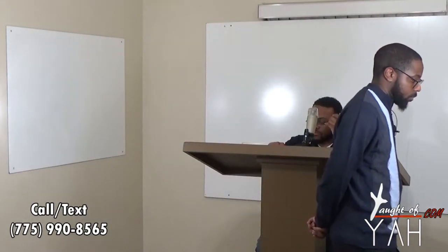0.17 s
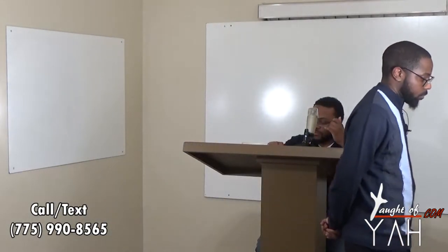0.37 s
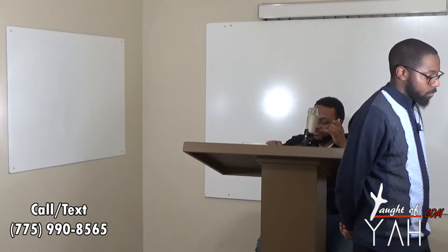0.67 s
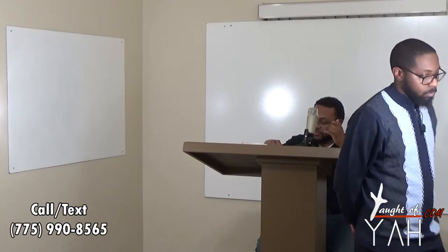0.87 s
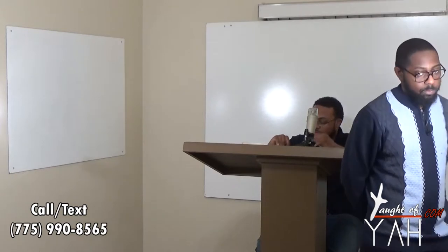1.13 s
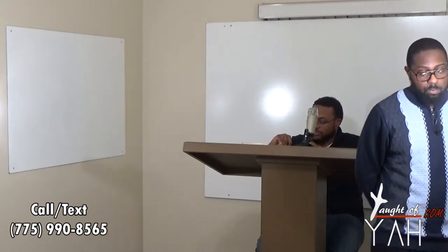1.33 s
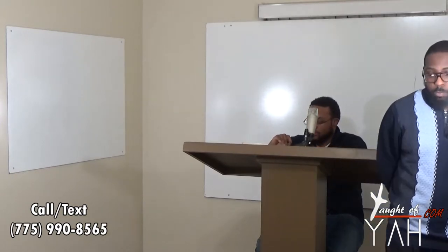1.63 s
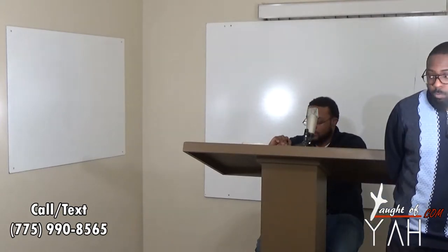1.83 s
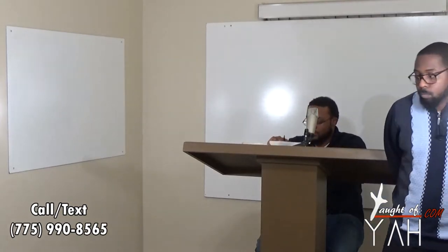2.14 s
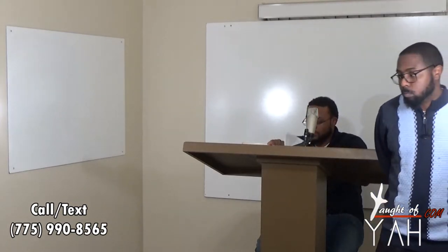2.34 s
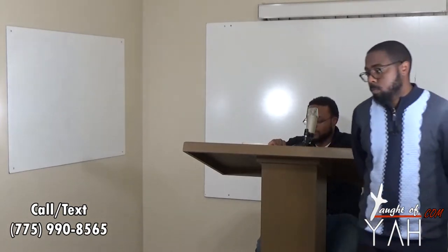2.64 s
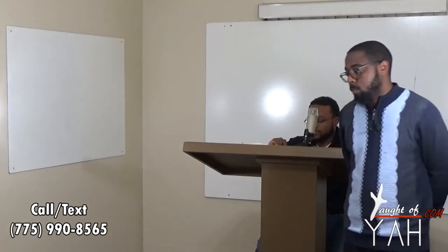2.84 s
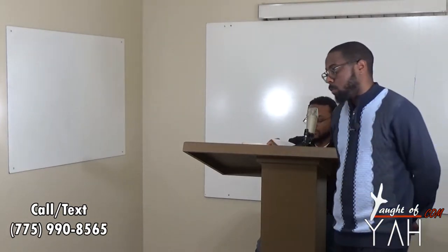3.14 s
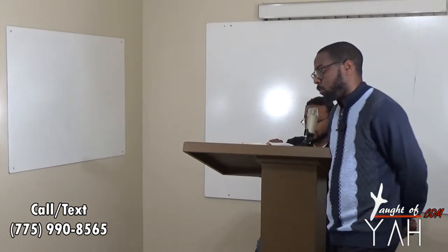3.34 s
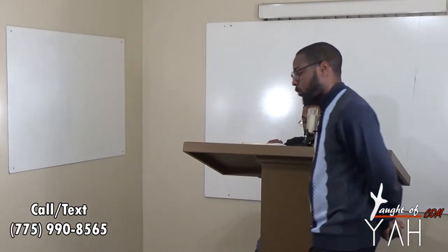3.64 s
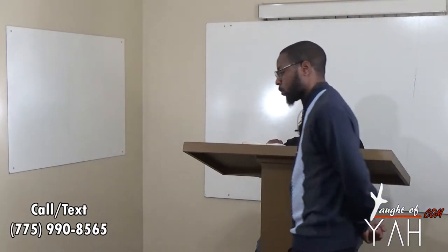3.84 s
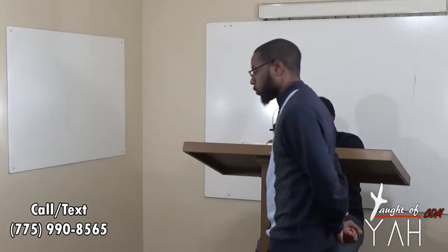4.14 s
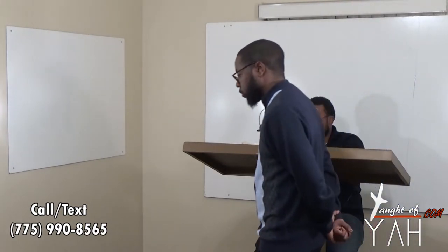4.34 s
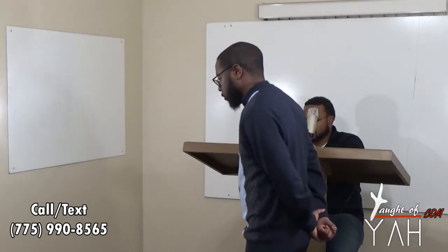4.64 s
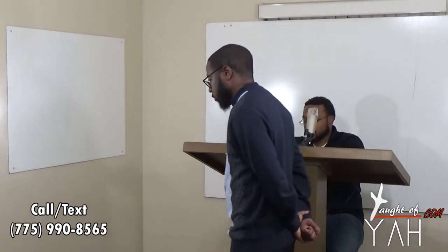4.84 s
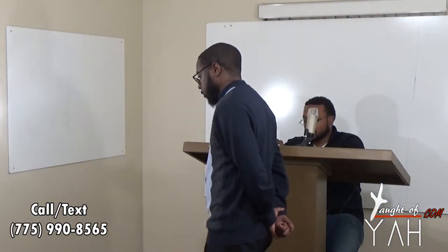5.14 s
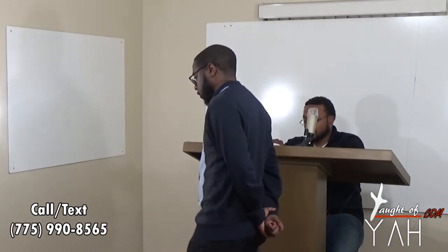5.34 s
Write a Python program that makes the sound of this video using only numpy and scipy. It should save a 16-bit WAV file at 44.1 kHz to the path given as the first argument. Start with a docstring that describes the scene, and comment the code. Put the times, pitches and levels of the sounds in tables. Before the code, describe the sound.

A thin paper page hisses as it is slid, crackles sharply while turned, lands softly, and small rustles continue in a hushed room.

```python
"""A lectern in a quiet room, a microphone just above it: thin book pages are slid, lifted and flipped.
Sliding paper hisses in tiny slips: noise pushed in swells through the sheet, its cut edge and the flapping page.
Creases snap in short noise bursts as the sheet buckles, and the turned page lands with a soft low thud.
The walls answer faintly; the room hisses in shaped noise, the mains hum in three sines, the upper two wavering.
All of it is dull above about 11 kHz."""
import sys
import numpy as np
from scipy import signal
from scipy.fft import rfft, irfft, next_fast_len
from scipy.io import wavfile
from scipy.ndimage import uniform_filter1d, map_coordinates

SR = 44100
rng = np.random.default_rng(int(sys.argv[2]) if len(sys.argv) > 2 else 0)


def dump(signal):
    """Clip the signal to [-1, 1] and save it as 16-bit WAV at the path in sys.argv[1]."""
    limited = np.clip(np.atleast_2d(signal).T, -1, 1)
    pcm = np.round(limited * 32767).astype(np.int16)
    wavfile.write(sys.argv[1], SR, pcm)


N = 242734

# What the free sheet radiates. Each row: frequency as a multiple of its ring, gain in dB.
SHEET = [(.03, -72.5), (.4, -14), (.65, -0.5), (1.01, 1), (1.5, -3.5), (2.2, -9), (6, -38.5)]
# What the cut edge of the paper radiates. Each row: frequency in Hz, gain in dB.
EDGE = [(300, -75.5), (3500, -5.5), (5500, 0), (8000, -2), (11000, -3), (13000, -5.5)]
# What the whole page radiates as it flaps. Each row: frequency in Hz, gain in dB.
FLAP = [(40, -46), (150, -33), (350, -12.5), (600, -7), (1100, 0), (1700, 0), (3500, -51.5)]
CRUMPLE_S = 1.5  # until then the page glides flat; after it, it buckles


def amp(db):
    """Decibels to an amplitude factor."""
    return 10 ** (np.asarray(db) / 20)


def unit(x):
    """x scaled to rms 1."""
    return x / np.sqrt(np.mean(x ** 2) + 1e-20)


def along(points, hz):
    """Read (frequency, value) points at hz, straight lines on a log frequency axis."""
    f, v = np.transpose(points)
    return np.interp(np.log(hz + 1e-3), np.log(f), v)


def wobble(rate):
    """A smooth random curve, rate knots a second."""
    knots = rng.standard_normal(int(N * rate / SR) + 4)
    return map_coordinates(knots, [np.arange(N) * rate / SR])


def filtered(x, response):
    """x times a response of frequency."""
    m = next_fast_len(N + SR // 2)
    gain = response(np.fft.rfftfreq(m, 1 / SR))
    return irfft(rfft(x, m) * gain, m)[..., :N]


def pulse(spectrum):
    """The causal (minimum-phase) answer to one jolt, with this spectrum and energy 1."""
    size = 2 ** 11
    log_gain = np.log(amp(along(spectrum, np.fft.rfftfreq(size, 1 / SR))))
    cepstrum = irfft(log_gain, size)
    # folding the cepstrum onto positive time makes the answer causal
    cepstrum[1:size // 2] *= 2
    cepstrum[size // 2 + 1:] = 0
    answer = irfft(np.exp(rfft(cepstrum)), size)[:size // 2]
    return answer / np.linalg.norm(answer)


def air():
    """Room hiss, nearly alike on both sides, and the mains hum, whose overtones waver."""
    # Colour of the room hiss. Each row: frequency in Hz, gain in dB.
    hiss_colour = [(25, -26), (50, -23), (90, -20.5), (200, -16.5), (400, -12.5), (860, -5), (1600, -4.5),
                   (4000, -7), (9800, -14.5), (12500, -11)]
    # How much the hiss differs between the sides. Each row: frequency in Hz, side against middle in dB.
    hiss_apart = [(30, -11), (150, -9.5), (500, -18), (2000, -28), (5000, -18), (8000, -12.5), (12000, -13)]
    # Mains hum. Each row: frequency in Hz, level in dB rms before swell and wavering.
    hum_lines = [(60, -93), (120, -94), (180, -91)]
    # Swell of the second hum line. Each row: time in seconds, gain in dB.
    hum_swell = [(0, -4), (1.2, 1), (2.2, 3.5), (2.9, 0), (3.7, 8), (4.3, 4.5), (4.6, -5), (5.5, -5)]
    hiss_db = -60.5  # rms of the middle, before the low-pass
    t = np.arange(N) / SR
    mid, side = filtered(rng.standard_normal((2, N)), lambda hz: amp(along(hiss_colour, hz)))
    side = filtered(side, lambda hz: amp(along(hiss_apart, hz)))
    hiss = amp(hiss_db) / np.std(mid) * np.array([mid + side, mid - side])
    hum = np.zeros(N)
    for k, (hz, db) in enumerate(hum_lines):
        swell_db = (k == 1) * np.interp(t, *np.transpose(hum_swell))
        waver_db = k * 0.47 * wobble(2.05)  # none on the lowest line
        hum += np.sqrt(2) * amp(db + swell_db + waver_db) * np.sin(2 * np.pi * hz * t)
    return hiss + hum


def strokes():
    """Pushes of the page add their power; edge, flap and ring are averages weighted by that power."""
    # Each push is a swell of friction. Each row: peak in seconds, rise in seconds, fall in seconds,
    # sheet level at the peak in dB, edge hiss in dB above the sheet, flap in dB above the sheet,
    # ring of the sheet in Hz.
    stroke_rows = [(0.25, .9, 1, -69.5, 0.5, -8, 2267), (0.7, 0.22, 0.5, -65, 1, -10, 2970),
                   (0.81, 0.073, 0.13, -58, 9.5, -9, 4270), (.94, 0.038, .03, -57.5, 5, 1, 2600),
                   (1.005, 0.04, 0.22, -52.5, 7, -6, 4900), (1.06, 0.059, 0.35, -44.5, 8, -20, 4630),
                   (1.175, 0.17, 0.1, -36.5, -13, -21, 4070), (1.29, 0.16, 0.2, -36.5, -12.5, -20, 3170),
                   (1.419, 0.12, .09, -39, -10, -20, 2880), (1.547, 0.084, 0.047, -36.5, -11, -15.5, 3360),
                   (1.607, 0.049, 0.1, -36.5, -3.5, -9, 3050), (1.712, 0.025, 0.11, -37.5, -13, -14, 3400),
                   (1.758, 0.025, 0.022, -33, -6, -17, 3570), (1.9, 0.27, 0.13, -50, -5, -11, 3000),
                   (1.988, 0.029, 0.13, -45, -3.5, -10.5, 2800), (2.135, 0.19, 0.16, -44.5, -5, -8.5, 2600),
                   (2.28, .3, 0.59, -52.5, 3, -7, 3150), (2.411, 0.17, 0.11, -40, -8.5, -10.5, 2800),
                   (2.671, 0.16, 0.2, -50.5, -13, -6, 2700), (2.888, 0.044, 0.26, -35, -1, -11, 2770),
                   (3.019, 0.13, 0.18, -37, -5, -14, 2480), (3.17, 0.24, .05, -45.5, -17, -12.5, 2190),
                   (3.3, 0.11, 0.13, -52, -0.5, -5.5, 2360), (3.47, 0.14, 0.15, -52.5, 1.5, -15.5, 2000),
                   (3.55, 0.24, 0.039, -61, 8, -18, 2250), (3.775, .15, .08, -59.5, -2.5, -7.5, 2740),
                   (3.832, .03, .06, -58, 0, -11, 2600), (3.93, .1, .15, -58, -6, -6, 3000),
                   (4.057, 0.094, 0.14, -54.5, -7, -13, 3130), (4.25, 0.56, 0.11, -60, -4, -8.5, 2950),
                   (4.54, 0.046, 0.44, -59.5, -9, -13, 2620), (4.68, 0.32, .12, -54.5, -5.5, -10.5, 2850),
                   (4.84, 0.1, 0.22, -60, -5, -6.5, 2800), (4.99, 0.078, 0.38, -57, -6, -18, 2600),
                   (5.137, 0.22, 0.28, -58.5, -2, -8.5, 2390), (5.29, 0.04, 0.25, -55.5, -6, -13, 2500),
                   (5.5, 0.097, .2, -58, -10, -22, 2700)]
    swell_db = 20  # what a stroke gains over its rise and loses over its fall
    roundness = 1.224  # 1 = pointed swell, more = flatter top and steeper ends
    peak, rise, fall, db, *colour = np.transpose(stroke_rows)[..., None]
    step = 64  # samples between computed points
    s = np.arange(0, N + step, step) / SR
    distance = np.abs((s - peak) / np.where(s < peak, rise, fall))
    power = amp(db - swell_db * distance ** roundness) ** 2 + 1e-20
    total = power.sum(axis=0)
    colours = (power * colour).sum(axis=1) / total
    curves = [10 * np.log10(total), *colours]
    return [np.interp(np.arange(N) / SR, s, c) for c in curves]


def patchy(depth_db):
    """White noise whose gain wanders in small patches of time and frequency."""
    z = signal.stft(rng.standard_normal(N), nperseg=256)[2]
    field = uniform_filter1d(rng.standard_normal(z.shape), size=5, axis=0)
    field = uniform_filter1d(field, size=6, axis=1)
    return unit(signal.istft(z * amp(depth_db * unit(field)), nperseg=256)[1][:N])


def crinkle(rate, spread_db, life):
    """Envelope of small buckles at random moments, rate a second, each dying 60 dB in life seconds; rms 1."""
    happens = rng.random(N) < rate / SR
    scatter_db = spread_db * np.clip(rng.standard_normal(N), -2, 2)
    clump_db = 1.5 * wobble(25.17)  # neighbours grow and shrink together
    size = happens * amp(scatter_db + clump_db)
    t = np.arange(SR // 50) / SR
    return unit(signal.fftconvolve(size, amp(-60 * t / life))[:N])


def bending(x, s, ring_hz):
    """x through the sheet's broad resonance, which glides as the free span of paper grows or shrinks."""
    glide_focus = 1.32  # the flat gliding sheet rings more narrowly: its slopes are this much steeper
    hz, t, z = signal.stft(x, SR, nperseg=256)
    ratio = hz[:, None] / np.interp(t, s, ring_hz)
    gain = amp(along(SHEET, ratio) * np.where(t < CRUMPLE_S, glide_focus, 1))
    gain /= np.sqrt(np.mean(gain ** 2, axis=0))
    return signal.istft(z * gain, SR, nperseg=256)[1][:N]


def radiated(x, spectrum):
    """x through a part of the page whose resonance stays put."""
    return signal.fftconvolve(x, pulse(spectrum))[:N]


def slide():
    """Smooth friction noise mixed with small buckles; all parts of the page share the slips."""
    glide_buckle_db, crumple_buckle_db = -20, -9  # buckles in the mix, before and after the page crumples
    s = np.arange(N) / SR
    sheet_db, edge_db, flap_db, ring_hz = strokes()
    grip = amp(.8 * wobble(60) + 1.2 * wobble(200))  # the page catches and lets go
    buckle_db = np.where(s < CRUMPLE_S, glide_buckle_db, crumple_buckle_db)
    buckles = amp(buckle_db) * crinkle(rate=210, spread_db=6, life=0.012)
    force = amp(sheet_db) * unit(grip + buckles)
    sheet = bending(force * patchy(depth_db=2.0), s, ring_hz)
    edge = radiated(amp(edge_db) * force * patchy(depth_db=3.0), EDGE)
    flap = radiated(amp(flap_db) * force * patchy(depth_db=1.0), FLAP)
    return sheet + edge + flap


def ticks():
    """Small creases that give way at random once the page buckles, in the columns that snaps() reads."""
    ticks_per_s, mean_ms = 13, 1.07  # mean length is as drawn, before snaps() limits it
    above_sliding_db, scatter_db = 3, 3
    edge_db, edge_scatter_db, flap_db = -4.5, 9, -23  # above the sheet
    span = N / SR - CRUMPLE_S
    moment, size, bright, length = rng.random((int(ticks_per_s * span), 4)).T
    s = CRUMPLE_S + span * moment
    sliding_db = strokes()[0][(s * SR).astype(int)]
    db = sliding_db + above_sliding_db + scatter_db * (2 * size - 1)
    edges = edge_db + edge_scatter_db * (2 * bright - 1)
    return list(zip(s, db, edges, np.full_like(s, flap_db), 2 * mean_ms * length))


def snaps():
    """Each crease gives way in a short burst that shakes sheet, edge and page at its own strengths."""
    # The clearest creases. Each row: time in seconds, sheet level in dB before the boost for short snaps,
    # edge in dB above the sheet, flap in dB above the sheet, length in ms.
    snap_rows = [(0.2547, -59, 7, -8, 2.3), (1.3086, -35, 10.5, -15, 1.1), (1.517, -37, -7, -26, 3.8),
                 (1.527, -46, 9, -13, 1.4), (1.5498, -28.5, -0.5, -19, 0.24), (1.567, -37.5, -19, -8, 1.5),
                 (1.5753, -34, -5, -16, .9), (1.592, -33, -16, -25, 2.8), (1.611, -33, -11, -5.5, 5.6),
                 (1.6637, -42.5, 5.5, -19, 1.1), (1.7056, -32.5, 2.5, -17, 4), (1.7158, -36, -1, -18, 7.8),
                 (1.725, -26.5, 0.5, -26, 1.5), (1.749, -39, 9, -7.5, 1.7), (1.7631, -38, 8, -12, 2),
                 (1.7818, -39, -11, -28, 3.1), (1.9059, -34, -9, -12, 0.89), (1.952, -41, -12, -11, 5.7),
                 (1.9752, -36.5, -22, -18, 5.9), (1.9802, -34, -2, -16, 1.7), (1.9857, -39, -10, -25, 1.8),
                 (2.002, -29, 4.5, -19, 1.5), (2.0513, -32, -5, -19, 1.7), (2.0561, -35, -1.5, -11, 1.9),
                 (2.0917, -35.5, -0.5, -7, 1.3), (2.101, -37, -3, -5, 2.4), (2.1388, -31.5, -13, -20, 15),
                 (2.1692, -35.5, 1, -25, 1.2), (2.1815, -36, -9, -21, 5.9), (2.203, -33, -10.5, -19, .56),
                 (2.2156, -45, 1, -23, 1.3), (2.238, -37, -5, -17, 4.8), (2.316, -34.5, -4, -12.5, 5.2),
                 (2.3403, -39, 5, -25, 0.82), (2.3446, -39, 4, -6, 5.8), (2.389, -41.5, 5, -23, 6.3),
                 (2.5877, -45, -6.5, -13.5, 15), (2.6262, -37, -10, -19, 1.1), (2.6486, -41, -7, -30, 5.5),
                 (2.6664, -51, -15, -8, 3.2), (2.683, -35, -16, -18, 1.5), (2.701, -41, -3, -25, 2.9),
                 (2.7256, -43.5, 1, -23, 1.2), (2.754, -49.5, 0, -5, 3.7), (2.8223, -41.5, -25, -11, 4.8),
                 (2.8504, -54.5, 17, -8, 5.3), (2.879, -33, 5, -18, 4), (2.978, -35, 2.5, -7, 9.9),
                 (3.011, -24, 1.3, -14.5, 5.2), (3.0495, -35.5, 5.5, -28, .9), (3.055, -30, -22, -29, 1.2),
                 (3.0917, -37.5, -4, -3, 2.5), (3.1347, -42, -19, -24, 5.3), (3.1895, -47, 6, -7, 3.1),
                 (3.2262, -49.5, 2, 2, 4.4), (3.302, -50.5, -4, -5, 9.7), (3.36, -39.5, -22, -28, 1.6),
                 (3.3684, -42, -9, -16, 4.4), (3.4535, -47.5, 1.3, -3.5, 6.9), (3.4622, -40, -10, -13, 1.7),
                 (3.4743, -43, -9, -24, 1.2), (3.4827, -44, -7, -10, 2.3), (3.6221, -59, -9, 12, 1.4),
                 (3.6612, -47.5, -6, 0.5, 3.4), (3.7957, -48, -10, 0, 4.7), (3.9411, -56, 4, -9, .8),
                 (4.0093, -53, 2, -8, 2.8), (4.0365, -50, -14, -7, 3.3), (4.127, -59.5, 11, 0, 3.2),
                 (4.1602, -48, -1, 2, 1.5), (4.2037, -52.5, -1, -9, 2.7), (4.243, -44, 0, -9, .65),
                 (4.3413, -53.5, -23, -5, 8.7), (4.5378, -61, -4, -6, 1.6), (4.6258, -45.5, -7, -6, 2.8),
                 (4.6354, -48, 5, -19, 1.6), (4.663, -34, 1.8, -14, 1.16), (4.715, -49, -16, -21, 1.4),
                 (4.8367, -48.5, -17, -12, .77), (4.9689, -47, 0, -11, 3.5), (5.123, -46, 8.5, 4, 2.3),
                 (5.1506, -46, 12, 1, 0.77), (5.2166, -52.5, 12.5, 3, 2.6), (5.2798, -56.5, 8, 4.5, 3.8),
                 (5.2865, -43, 6, -2.5, 1.8), (5.2971, -51, 9, -20, 2.4), (5.3142, -46.5, -9, -18, 2.8)]
    crease_hz = 2890  # where the sheet rings when a crease snaps
    lead = SR // 50  # room for the swell ahead of each snap, in samples
    t_ms = (np.arange(4 * lead) - lead) * 1000 / SR
    ring = [(crease_hz * ratio, db) for ratio, db in SHEET]
    parts = np.array([pulse(ring), pulse(EDGE), pulse(FLAP)])
    out = np.zeros(N + 4 * lead)
    for s, db, edge_db, flap_db, length_ms in snap_rows + ticks():
        length_ms = np.clip(length_ms, .3, 12)
        shape = np.exp(-np.abs(t_ms) / (length_ms * np.where(t_ms < 0, .4, .75)))  # quick swell, slower fall
        shape += 0.84 * np.exp(-np.abs(t_ms) / 0.059)  # the sharp crack as the fold flips through
        shape *= amp(db) * np.sqrt(1 + 0.67 / length_ms)  # a shorter snap packs into a higher peak
        noise = shape * rng.standard_normal((3, len(t_ms)))
        burst = signal.fftconvolve(noise, parts, axes=1)[:, :len(t_ms)]
        # each part carries the energy of the shape
        burst *= np.linalg.norm(shape) / np.linalg.norm(burst, axis=1, keepdims=True)
        out[round(s * SR):][:len(t_ms)] += amp([0, edge_db, flap_db]) @ burst
    return out[lead:lead + N]


def landing():
    """The air squeezed under the page falling on the stack gives one soft low thud, a dying sine."""
    # The thud in one row: start in seconds, level in dB ahead of onset and decay, pitch in Hz,
    # time to die 60 dB in seconds.
    thud = (3.007, -41, 370, .03)
    s, db, hz, t60 = thud
    t = np.clip(np.arange(N) / SR - s, 0, None)
    onset = 1 - np.exp(-t / 0.0019)
    return amp(db - 60 * t / t60) * np.sin(2 * np.pi * hz * t) * onset


def noise_tail(x, delay):
    """x smeared into noise, delay seconds late, whose frequencies die at their own speeds."""
    # Each row: frequency in Hz, time to die 60 dB in seconds.
    tail_decay = [(300, 0.12), (2000, 0.056), (10000, 0.05)]
    hz, t, z = signal.stft(rng.standard_normal(SR // 2), SR, nperseg=256)
    decay = amp(-60 * t / along(tail_decay, hz)[:, None])
    tail = signal.istft(z * decay, SR, nperseg=256)[1]
    late = np.pad(x, (round(delay * SR), 0))
    return signal.fftconvolve(late, tail / np.linalg.norm(tail))[:N]


def walls(pages):
    """The room's faint answer to the pages, the same on both sides."""
    return amp(-17) * noise_tail(pages, delay=.004)


def side_noise(pages):
    """A faint noise that follows the pages, opposite in sign on the two sides."""
    # Colour of this noise. Each row: frequency in Hz, gain in dB.
    side_colour = [(60, -14), (140, -19), (350, -25), (840, -34), (2020, -43.5), (4850, -36), (11700, -21)]
    side = filtered(noise_tail(pages, delay=0.0016), lambda hz: amp(along(side_colour, hz)))
    return np.array([side, -side])


def scene():
    """The pages and the walls' answer in the middle, side noise and the air of the room around them."""
    pages = slide() + snaps() + landing()
    return pages + walls(pages) + side_noise(pages) + air()


def record(dry):
    """The sound is dull above about 11 kHz: a steep low-pass, and nothing above the limit."""
    edge_hz, top_hz = 11050, 12285
    band_edge = [(edge_hz - 150, 0), (edge_hz + 120, -26), (top_hz, -55)]  # Hz, dB
    return filtered(dry, lambda hz: amp(along(band_edge, hz)) * (hz < top_hz))


dry = scene()
out = record(dry)
dump(out)
```